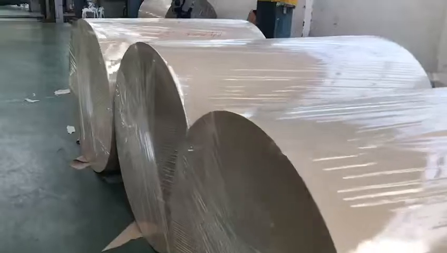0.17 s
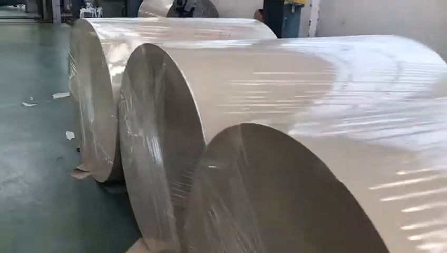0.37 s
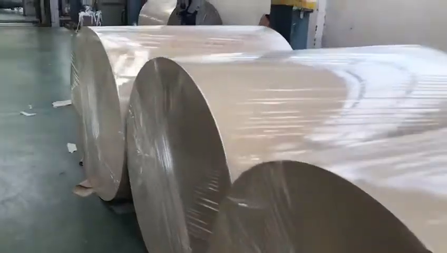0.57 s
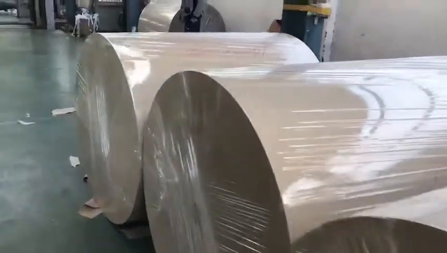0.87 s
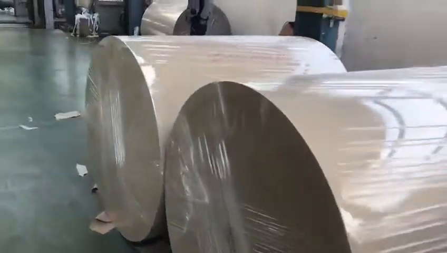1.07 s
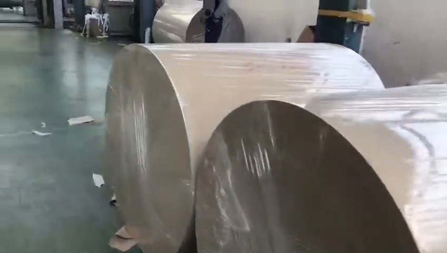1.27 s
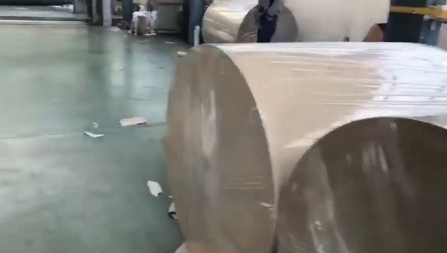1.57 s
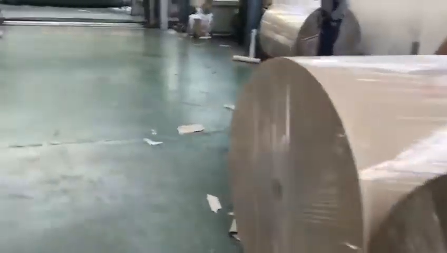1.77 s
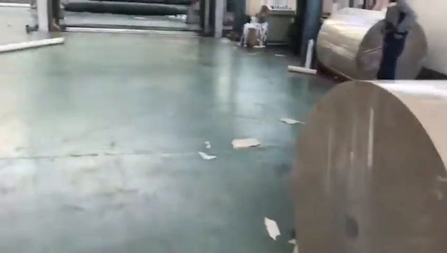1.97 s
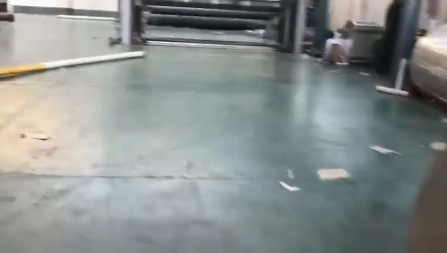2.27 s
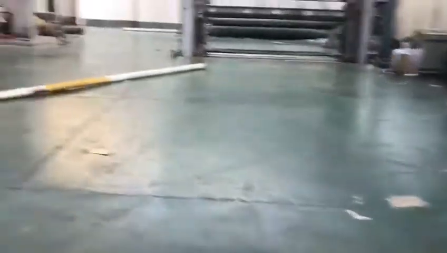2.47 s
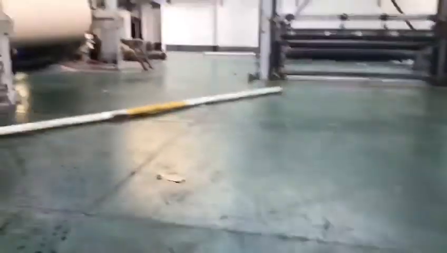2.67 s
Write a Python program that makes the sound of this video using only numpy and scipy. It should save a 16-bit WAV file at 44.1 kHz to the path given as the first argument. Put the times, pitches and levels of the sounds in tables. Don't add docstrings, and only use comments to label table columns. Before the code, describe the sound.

Paper machine drone in a large mill hall. Silence until about 0.12 s, then an abrupt clicked start into full rumble, hum and hiss. Low motor hum swells around 0.6-1 s, dips near 1.5 s, then grows strongest from 2.2 s to the end. A gear tone stands out around 0.6 and 1.4-1.7 s, then recedes. Faint fan whine flutters above; dull, grainy phone treble brightens slightly.

```python
import sys
import numpy as np
from scipy import signal
from scipy.fft import rfft, irfft, next_fast_len
from scipy.io import wavfile
from scipy.ndimage import uniform_filter1d, map_coordinates

SR = 44100
rng = np.random.default_rng(int(sys.argv[2]) if len(sys.argv) > 2 else 0)


def elevation(decibels):
    levels = np.asarray(decibels, float)
    return 10 ** (levels / 20)


def wav_record(signal):
    frames = np.transpose(np.atleast_2d(signal))
    bounded = np.clip(frames, -1, 1)
    quanta = np.round(bounded * 32767).astype(np.int16)
    wavfile.write(sys.argv[1], SR, quanta)


N = 124803

# time in seconds, nearness in dB, motor hum in dB, gear mesh in dB.
WALK = [(0.14, -38, -49, -51), (0.21, -38.5, -46, -39), (0.59, -39.5, -23.5, -28.5),
        (0.98, -38.5, -23.5, -34.5), (1.45, -39, -36.5, -26), (1.51, -39.5, -46, -25),
        (1.68, -38.5, -25.5, -25.5), (2.19, -37.5, -18, -43), (2.22, -38, -19.5, -35),
        (2.78, -38, -17.5, -44), (2.82, -35, -16.5, -49)]
GEAR_MESH_HZ = 334.4


def unit(x):
    return x / np.sqrt(np.mean(x ** 2) + 1e-20)


def curves(rows):
    time_s, *columns = np.transpose(rows)
    return [np.interp(np.arange(N) / SR, time_s, column) for column in columns]


def wobble(rate_hz):
    knot = np.clip(np.arange(N) * rate_hz / SR, 0, 199)
    return map_coordinates(rng.standard_normal(200), [knot])


def filtered(x, response):
    size = next_fast_len(N + SR // 2)
    return irfft(rfft(x, size) * response(np.fft.rfftfreq(size, 1 / SR)), size)[..., :N]


def tone(hz, level_db):
    flutter_db, wander_rad = 0.5, 0.5
    phase = 2 * np.pi * (hz * np.arange(N) / SR + rng.random()) + wander_rad * wobble(2.94)
    return np.sqrt(2) * elevation(level_db + flutter_db * wobble(7.4)) * np.sin(phase)


def standing(base_hz, rows):
    t = np.arange(N) / SR
    total = np.zeros(N)
    for multiple, level_db, swing_db, loud_s, apart_s in rows:
        swell_db = swing_db * np.cos(2 * np.pi * (t - loud_s) / apart_s)
        total += tone(base_hz * multiple, level_db + swell_db)
    return total


def motor():
    shaft_hz = 24.8
    # shaft multiple, level in dB, swing in dB, a loud moment in s, s between loud moments.
    orders = [(2, -40.5, 4, 1.9, 3.3), (5, -45.5, 6.5, 0.64, 0.88), (6, -29.5, 2.5, 0.81, 2.9),
              (7, -34, 2, 1.3, 1.5), (8, -32, 4, 1.96, 3.9), (10, -36.5, -8.5, 0.68, 1.4)]
    return tone(4 * shaft_hz, curves(WALK)[1]) + standing(shaft_hz, orders)


def gear_mesh():
    return tone(GEAR_MESH_HZ, curves(WALK)[2] - 1)


def vacuum_pump():
    # shaft multiple, level in dB, swing in dB, a loud moment in s, s between loud moments.
    orders = [(1, -28.5, 4.4, 2.17, 4.2), (2, -34.5, 2.9, 0.83, 1.74), (6, -35.5, 4, 1.07, 3.2),
              (7, -27.5, 2.4, 1.19, 0.92)]
    return standing(36.75, orders)


def mains_hum():
    # mains multiple, level in dB, swing in dB, a loud moment in s, s between loud moments.
    orders = [(6, -40.5, 2.8, 0.99, 1), (12, -41.5, 5.7, .45, .95)]
    return standing(50.03, orders)


def fans():
    blade_hz = [238.5, 1040.3, 580, 991, 1006, 1018.6]
    # level in dB, swing in dB, a loud moment in s, s between loud moments.
    swells = [(-34, 5, 0.74, 1.8), (-44.5, 5.5, 0.62, .45), (-52.5, 9, .8, 1.5), (-47.5, 3, 0.27, 3),
              (-38.5, 3, 0.48, 2.1), (-45, 1.5, 1, 1)]
    return standing(1, [(hz, *row) for hz, row in zip(blade_hz, swells)])


def fuzzy(hz, level_db, width_hz):
    ring = filtered(rng.standard_normal(N), lambda f: 1 / (1 + (2 * (f - hz) / width_hz) ** 2))
    return elevation(level_db) * unit(ring)


def upper_gear_orders():
    # mesh multiple, level in dB, width in Hz.
    orders = [(2, -42, 18), (3, -44, 24), (5, -52.5, 13), (10, -53, 16), (20, -65.5, 66)]
    return sum(fuzzy(k * GEAR_MESH_HZ, level_db, width_hz) for k, level_db, width_hz in orders)


def panels():
    # frequency in Hz, level in dB, width in Hz.
    resonances = [(455.7, -45, 23), (606.3, -47.5, 10), (1010, -48.5, 13), (1333, -46, 160),
                  (2946, -51.5, 210), (5520, -61, 310), (5934, -61.5, 170), (8390, -66, 440)]
    return sum(fuzzy(*row) for row in resonances)


def rush(spectrum, patchy_db):
    z = signal.stft(rng.standard_normal(N + 512), nperseg=512)[2]
    field = uniform_filter1d(rng.standard_normal(z.shape), 6, 0)
    field = uniform_filter1d(field, 12, 1)
    noise = signal.istft(z * elevation(patchy_db * unit(field)), nperseg=512)[1][:N]
    f, db = np.transpose(spectrum)
    return unit(filtered(noise, lambda hz: elevation(np.interp(np.log(hz + 1), np.log(f + 1), db))))


def rumble():
    # frequency in Hz, density in dB per Hz.
    spectrum = [(13, -68), (22, -13), (193, -4.5), (248, -1), (395, -16.5), (523, -18), (601, -20.5),
                (747, -27), (900, -19.5), (1170, -25), (1980, -120)]
    near_db = curves(WALK)[0]
    rise_db = near_db - near_db.mean()
    return elevation(-26.5 + 0.17 * rise_db + 1.7 * wobble(3.9)) * rush(spectrum, patchy_db=1.0)


def hiss():
    # frequency in Hz, density in dB per Hz.
    spectrum = [(290, -44), (500, -17), (591, -5), (728, -9), (934, -10), (1020, -3.5), (1180, -10.5),
                (3450, -23.5), (13800, -43)]
    treble_hz, treble_growth_db = 6000, 1.1
    noise = rush(spectrum, patchy_db=1.02)
    highs = filtered(noise, lambda hz: hz ** 2 / (hz ** 2 + treble_hz ** 2))
    approach = np.linspace(-1, 1, N)
    noise = noise + (elevation(treble_growth_db * approach) - 1) * highs
    return elevation(curves(WALK)[0] + 6 + 0.15 * wobble(10.32)) * noise


def scene():
    tones = motor() + gear_mesh() + vacuum_pump() + mains_hum() + fans()
    return (tones + upper_gear_orders() + panels() + rumble() + hiss())[None]


def thinned(x):
    # frequency in Hz, rounding step over the usual level in dB.
    coarse = [(300, -20), (3000, 1), (5000, 6), (7500, 7), (9700, 5), (10400, 11), (11100, 6.5), (13400, 8),
              (14100, 7)]
    size, band_hz = 1024, 345
    frame_db, band_db = 2, 1.6
    n, k = np.arange(2 * size), np.arange(size)
    window = np.sin(np.pi * (n + .5) / (2 * size))
    basis = window[:, None] * np.cos(np.pi / size * np.outer(n + .5 + size / 2, k + .5))
    blocks = np.pad(x[0], (size, 2 * size - N % size)).reshape(-1, size)
    c = np.hstack([blocks[:-1], blocks[1:]]) @ basis
    hz = (k + .5) * SR / (2 * size)
    power = uniform_filter1d(c ** 2, size=40, axis=0)
    usual = np.sqrt(abs(uniform_filter1d(power, size=32)))
    by_frame = uniform_filter1d(rng.standard_normal((len(c), 1)), 3, 0)
    by_band = uniform_filter1d(rng.standard_normal((len(c), 100)), 5, 0)
    scatter_db = frame_db * by_frame + band_db * by_band
    band = np.clip((hz / band_hz).astype(int), 0, 99)
    step_db = np.interp(hz, *np.transpose(coarse)) + scatter_db[:, band]
    step = usual * elevation(step_db) + 1e-9
    rounded = np.sign(c) * np.floor(abs(c) / step + .4) * step
    frames = rounded @ basis.T * 2 / size
    return (frames[1:, :size] + frames[:-1, size:]).ravel()[None, :N]


def microphone(x):
    low_hz, dip_hz, dip_width_hz, dip_db = 29.4, 10570, 350, -4

    def response(hz):
        low_cut = hz ** 6 / (hz ** 6 + low_hz ** 6)
        return low_cut * elevation(dip_db * np.exp(-((hz - dip_hz) / dip_width_hz) ** 2))

    return filtered(x, response)


def opening(x):
    start_s, start_level, settle_s, open_s, top_hz = .1204, .19, .0015, .00003, 14190
    t = np.arange(N) / SR - start_s
    jump = start_level - x[:, round(start_s * SR), None]
    step = jump * np.exp(-np.abs(t) / settle_s)
    gate = np.clip(t / open_s, 0, 1)
    return filtered((x + step) * gate, lambda hz: 1 / (1 + (hz / top_hz) ** 150))


def low_pass(x):
    return signal.sosfilt(signal.butter(12, 14190, fs=SR, output="sos"), x)


def record(dry):
    return low_pass(opening(thinned(microphone(dry))))


dry = scene()
out = record(dry)
wav_record(out)
```